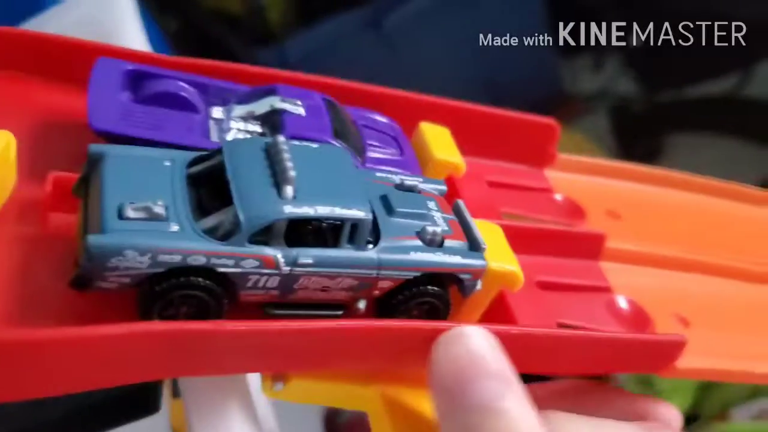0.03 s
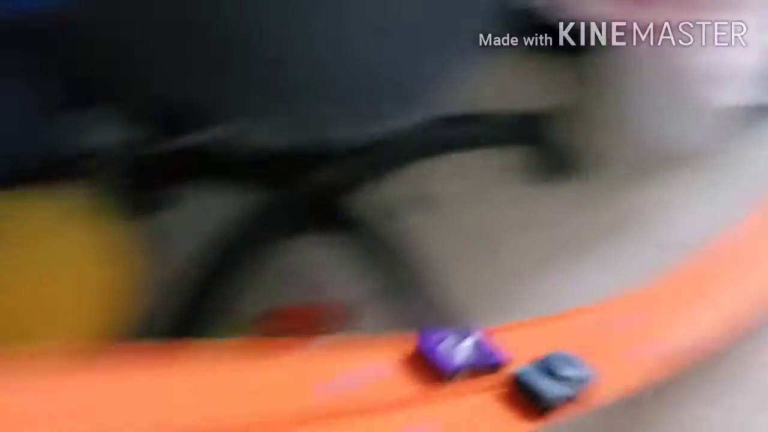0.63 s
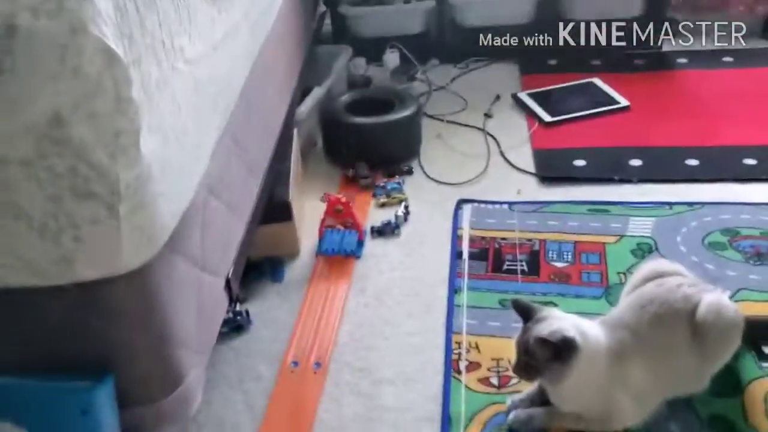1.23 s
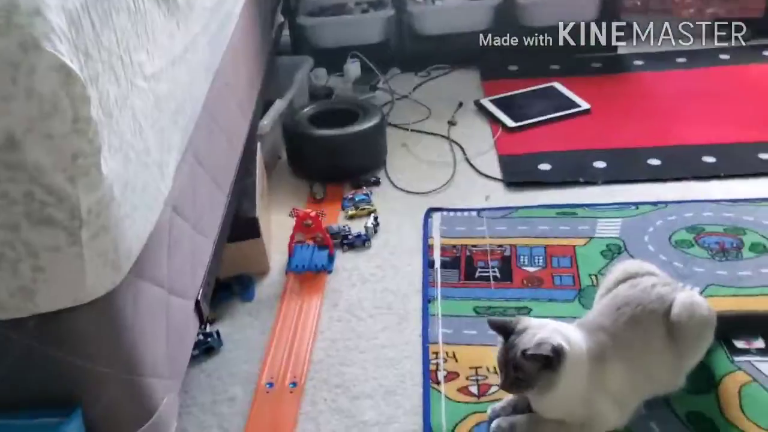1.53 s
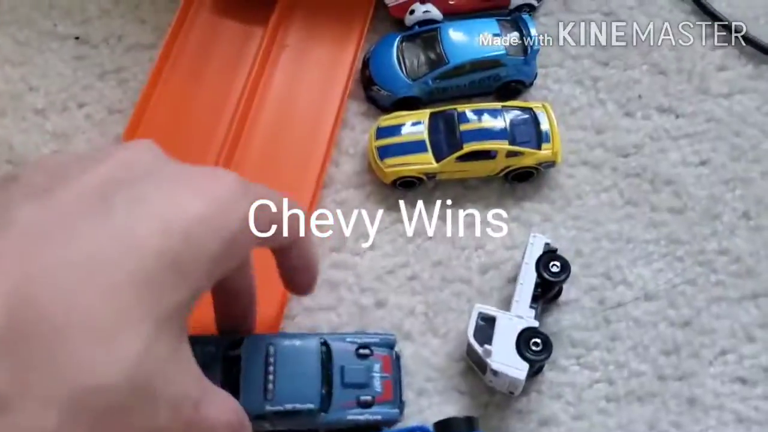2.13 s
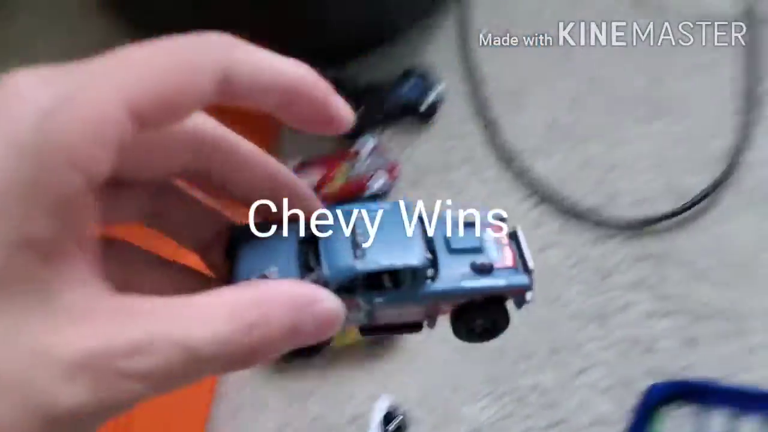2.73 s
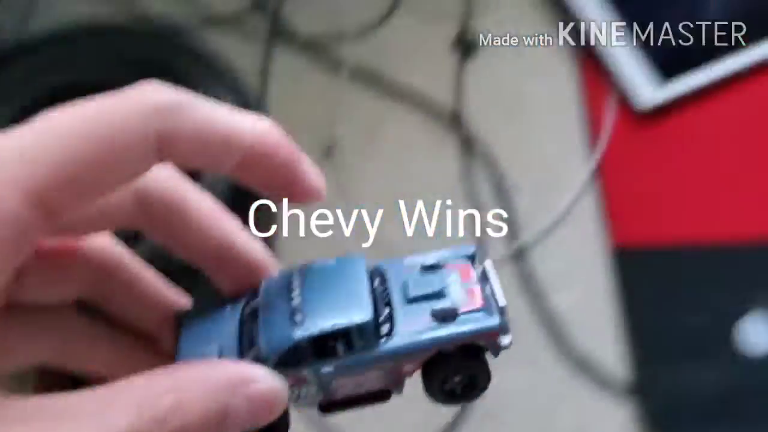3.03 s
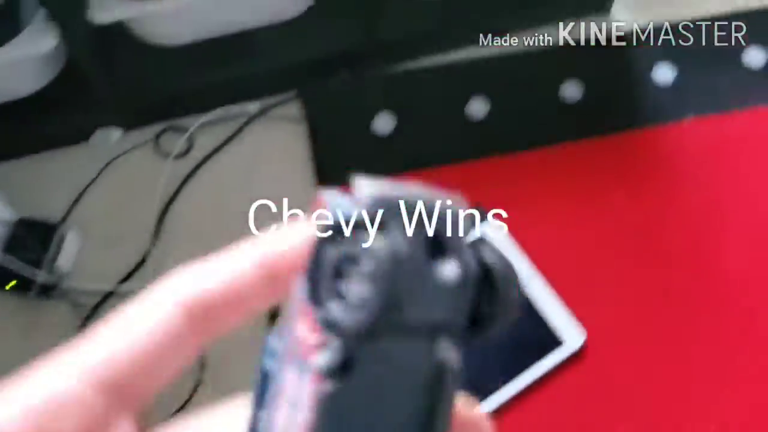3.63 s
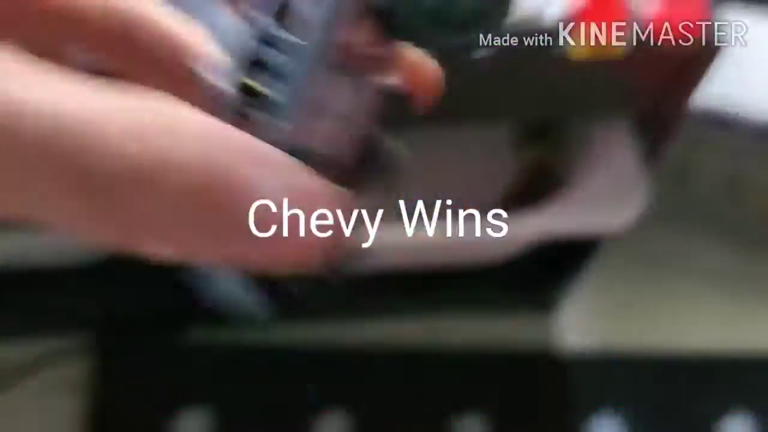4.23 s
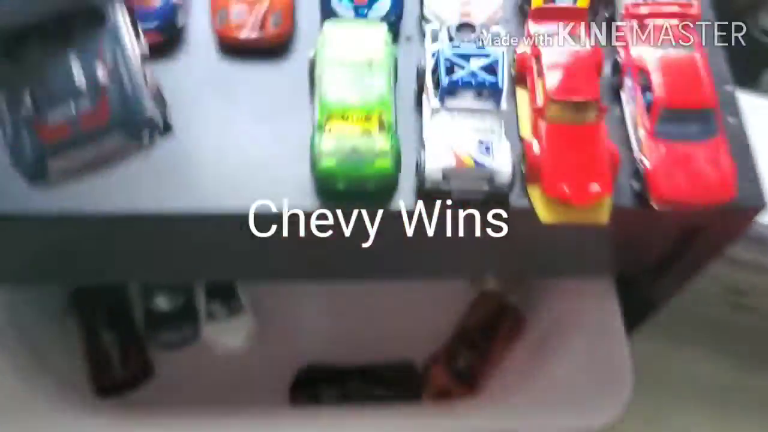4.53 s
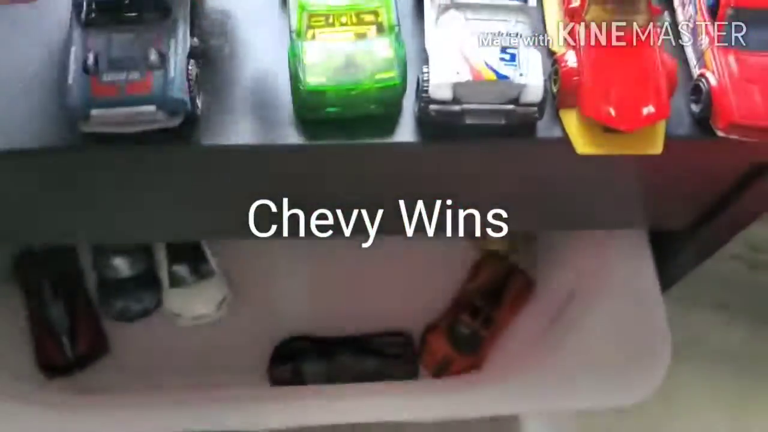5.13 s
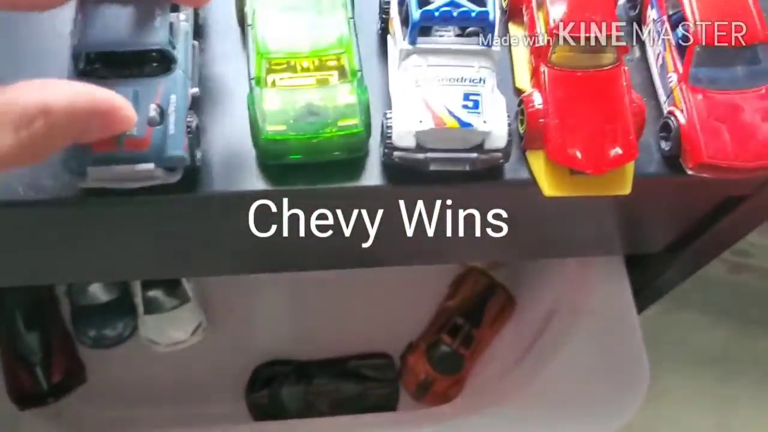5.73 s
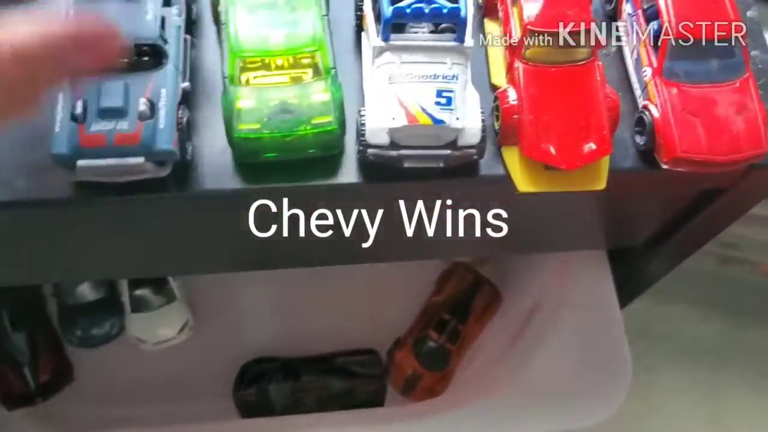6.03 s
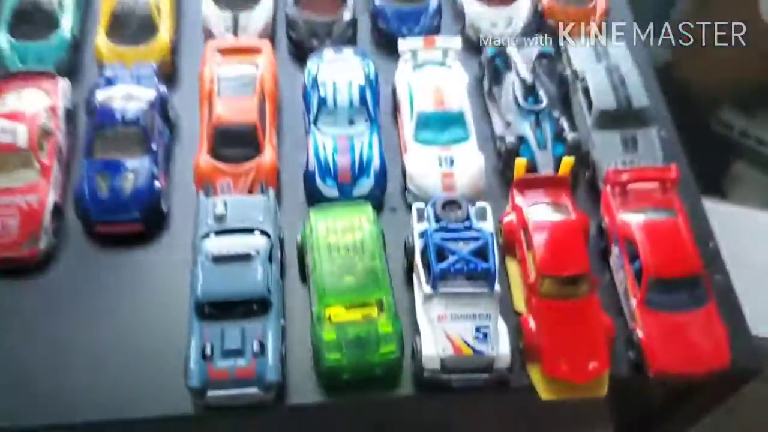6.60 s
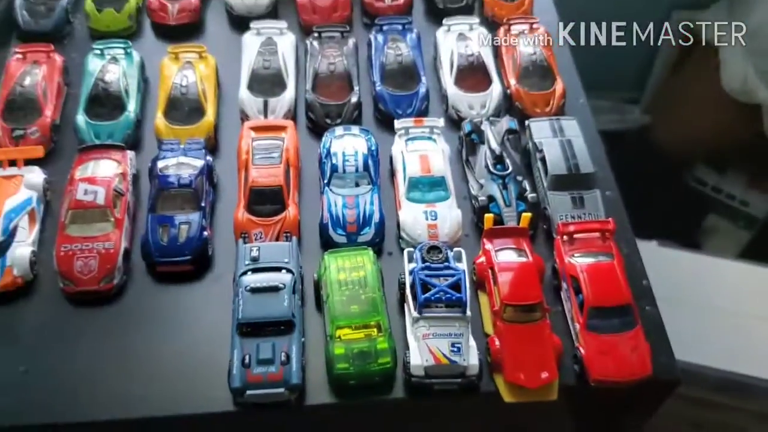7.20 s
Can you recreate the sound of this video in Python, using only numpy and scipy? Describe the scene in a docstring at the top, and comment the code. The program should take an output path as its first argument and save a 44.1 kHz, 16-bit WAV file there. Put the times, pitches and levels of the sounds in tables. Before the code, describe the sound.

At about 0.4 seconds, two die-cast toy cars drop onto a plastic track and rattle along it, slightly right at first, rumbling and clacking over joints as their whirr rises. From 1.2 to 1.5 seconds they skid and crash loudly into a hollow plastic gate. The sound drops out at 1.7 seconds, and a quieter stretch fades in with a small room's low ventilation hum. From 2.2 to 4.5 seconds one car is handled close by, its body and loose wheels clicking, with faint sleeve rustle and dull palm creaks from 3 seconds. Fingers bump the left microphone around 2.7 and 4.1 seconds. The car knocks onto a wooden shelf at 5.1 and 5.3 seconds, rolls softly from 5.6 and stops with a knock near 6. More left-sided finger taps come between 6.6 and 7.1 seconds, with a sharp, loud thump at 6.8.

```python
"""In a small room with humming ventilation, two die-cast toy cars drop from a start gate, rattle down a
plastic track and crash into the hollow finish gate. The sound drops out briefly and a second scene
fades in: a hand picks up one car, its loose wheels clicking, while a sleeve rustles. The car knocks
down on a wooden shelf and is rolled into line. Fingers bump a phone beside its left microphone,
and the palm creaks against its case."""
import sys
import numpy as np
from scipy import signal
from scipy.fft import rfft, irfft, next_fast_len
from scipy.io import wavfile
from scipy.ndimage import map_coordinates

SR = 44100
rng = np.random.default_rng(int(sys.argv[2]) if len(sys.argv) > 2 else 0)


def dump(signal):
    """Clip the signal to [-1, 1] and save it as 16-bit WAV at the path in sys.argv[1]."""
    limited = np.clip(np.atleast_2d(signal).T, -1, 1)
    pcm = np.round(limited * 32767).astype(np.int16)
    wavfile.write(sys.argv[1], SR, pcm)


N = 324576
TIME = np.arange(N) / SR
HIT_TIME = TIME[:SR // 3]  # the clock for one short hit

# The tone colour of each sound. Each row: frequency in Hz, relative level in dB.
VENT_COLOUR = [(20, -31), (35, -16), (56, 2.5), (80, 1.5), (110, -2), (135, -15.5), (168, -15), (200, -26),
               (235, -15), (262, -27), (295, -19), (345, -31.5), (470, -37), (1000, -58.5), (2500, -110)]
AIR_COLOUR = [(400, -23), (800, 2), (1400, 8.5), (2500, 1.5), (5000, -3.5), (6400, 6.5), (7500, -6),
              (15000, -5.5)]
WHEEL_COLOUR = [(1200, -39), (2200, -30), (2700, -3), (3300, -1.5), (3800, -0.5), (4400, 1), (5000, -3.5),
                (5500, -5), (6700, -5.5), (8000, -29), (11000, -44)]
TRACK_COLOUR = [(300, -37), (500, -17), (720, -21), (950, -4), (1150, -6), (1420, -2.5), (1650, -6),
                (2000, -2.5), (2500, -4.5), (3200, -12), (5000, -48)]
WHEEL_HISS_COLOUR = [(5000, -36.5), (7500, 2.5), (9000, -2.5), (10500, -2), (12000, 0.5), (15000, -7.5)]
RUMBLE_COLOUR = [(30, -30.5), (55, -9), (80, -0.5), (120, -2.5), (200, 0), (320, -4), (410, -4), (520, -13),
                 (700, -21), (1200, -50)]
GATE_WALL_COLOUR = [(180, -20), (310, 0.5), (430, 1.5), (580, -22.5), (1200, -39.5)]
SKIN_COLOUR = [(25, -30), (70, 8), (200, 6), (500, -1.5), (900, -5), (2000, -13.5), (3800, -15.5),
               (5000, -24), (7000, -21.5), (9000, -39), (15000, -28)]
SLEEVE_COLOUR = [(400, -9.5), (830, -19), (1400, -9.5), (1800, -10), (2300, -6), (3200, -12.5), (4400, -7),
                 (5200, -12), (6100, -8), (8000, -19), (12500, -19.5), (15500, -35)]
PALM_COLOUR = [(25, 1), (48, 8), (80, -4.5), (130, -15), (230, -3), (330, -14), (550, -25.5), (1200, -26.5),
               (3000, -42)]
SHELF_COLOUR = [(180, -5), (300, -7), (429, 1.5), (528, -12), (683, -2.5), (832, -15), (1000, -2),
                (1340, -4.5), (1660, -4), (1910, -9.5), (2260, -5), (2470, -37), (3200, -50), (4160, -55),
                (7040, -120)]
AXLE_COLOUR = [(1800, -7), (2600, -1), (3600, -0.5), (4600, 2.5), (5500, -10.5), (7000, -15.5), (8300, -31),
               (12500, -28), (14300, -23), (15500, -30)]
# The pitches at which each object rings when shaken. Each row: pitch in Hz, width in Hz, level in dB.
TRACK_RESONANCES = [(1954, 70, 1), (2210, 70, 0), (2314, 60, -2), (2690, 94, -6), (3145, 70, -9.5),
                    (3430, 91, -6), (3700, 50, -2), (3900, 150, -7), (4500, 110, -4.5)]
GATE_RESONANCES = [(298, 50, -7), (340, 32, 0), (379, 28, -1), (418, 28, -2), (466, 50, -13)]
CAR_RESONANCES = [(1440, 1000, -5.5), (2800, 740, 4), (3650, 540, 8.5), (4590, 820, 8), (6000, 660, 2)]
SHELF_RESONANCES = [(420, 69, 0), (612, 82, -21), (1025, 62, -1.5), (1680, 110, 1.5), (2300, 170, -8)]
# The notes of a knocked object. Each row: pitch in Hz, level in dB, seconds to fade by 60 dB.
PHONE_MODES = [(72, 12.5, 0.085), (174, -8.5, 0.099), (247, -6, 0.048)]
SHELF_MODES = [(335.4, -12, 0.023), (421, 11, 0.038), (537, -7.5, 0.078), (1017, -1.5, 0.042),
               (1720, 7, 0.017), (2260, 1.5, 0.023), (2945, -22.5, .014), (5030, -20, 0.0065)]
# How hard the racing wheels chatter. Each row: time in seconds, level in dB.
CHATTER_LEVELS = [(.32, -84.5), (.365, -71), (.44, -38.5), (.596, -34), (.61, -30), (.73, -32), (.85, -26),
                  (.98, -28), (1.1, -34), (1.25, -33.5), (1.37, -39.5), (1.43, -46.5), (1.56, -49),
                  (1.68, -45.5)]
# Their whirr climbs with speed. Each row: time in seconds, pitch in Hz.
WHIRR_PITCHES = [(.4, 1439), (.7, 1705), (1, 2171), (1.12, 2157), (1.25, 1932), (1.68, 1603)]
# The cars hit track joints and the gate. Each row: start in seconds, level in dB.
CRASHES = [(0.405, -50), (.4264, -44), (.439, -31.5), (.446, -35), (.599, -31), (.7209, -35), (.8445, -32),
           (1, -32.5), (1.243, -23.5), (1.266, -23.5), (1.292, -24), (1.356, -28.5), (1.363, -31),
           (1.436, -32.5), (1.5871, -43)]
# The track slaps under the cars. Each row: start in seconds, level in dB, pitch in Hz.
TRACK_SLAPS = [(.441, -31.5, 230), (0.448, -36, 168.2), (.462, -34, 170), (.72, -38, 218.6),
               (.999, -39, 151), (1.245, -41.5, 190), (1.296, -45.5, 198.9), (1.358, -26.5, 272)]
# The finish gate is rammed. Each row: start in seconds, level in dB.
GATE_BOOMS = [(1.357, -18.5), (1.372, -24.5), (1.47, -30)]
# The car is handled. Each row: start in seconds, level in dB, ping pitch in Hz, left minus right in dB.
CAR_CLICKS = [(2.188, -41.5, 3940, 6), (2.358, -47.5, 3950, 3), (2.572, -28.5, 3540, 3),
              (2.7, -38.5, 3670, 3.5), (3.253, -51, 4440, 6), (3.671, -51.5, 4450, 4),
              (3.774, -44.5, 4650, 4.5), (3.911, -48.5, 4580, 2), (4.031, -44.5, 3640, 2),
              (4.149, -40.5, 3940, 2), (4.202, -34, 4780, -5.5), (4.247, -44, 6960, 5),
              (4.484, -45.5, 3900, 10), (5.071, -36, 1950, 6), (5.111, -27.5, 2290, 1.5),
              (5.253, -32, 3020, 1.5), (5.95, -42, 2380, 1)]
# Loose wheels tick as the car is turned. Each row: start and end in seconds, level in dB.
CAR_TURNS = [(2.301, 2.505, -56.5), (3.701, 3.965, -55.5), (4.278, 4.383, -52)]
# Fingers tap the phone. Each row: start in seconds, tick level in dB, the frequency in Hz above which
# the tick weakens, thud level in dB.
FINGER_TAPS = [(2.658, -19.5, 1740, -33.5), (2.6608, -21, 302, -64), (4.092, -32, 300, -26),
               (4.127, -42, 200.5, -32), (6.589, -21, 674, -54), (6.654, -23.5, 1270, -45),
               (6.81, -6, 780, -48), (6.8135, -15.5, 1300, -7.5), (7.146, -34, 2200, -33)]
# The arm moves. Each row: middle and half length in seconds, sleeve level in dB, palm level in dB.
ARM_MOVES = [(3.086, 0.09, -59.5, -61.5), (3.304, 0.072, -58.5, -73), (3.504, 0.063, -58, -45.5),
             (3.799, .25, -63.5, -81), (4.122, 0.095, -53, -41.5), (4.316, 0.086, -66, -52.5),
             (4.556, 0.13, -50, -54)]
# The car meets the shelf. Each row: start in seconds, level in dB.
SHELF_LANDINGS = [(5.071, -27), (5.109, -25.5), (5.254, -31), (5.604, -38.5), (5.956, -28.5),
                  (6.032, -48.5)]
# How hard the car is pushed along the shelf. Each row: time in seconds, level in dB.
PUSH_LEVELS = [(5.55, -79), (5.6, -44.5), (5.67, -46.5), (5.84, -39), (5.92, -45.5), (5.97, -58),
               (6.02, -88)]
# How long the room echoes. Each row: frequency in Hz, seconds to fade by 60 dB.
ECHO_TIMES = [(150, 0.1), (600, 0.39), (1500, 0.27), (4000, 0.28), (14000, 0.18)]

RAMP_S, FINISH_S, RACE_END_S = 0.36, 1.235, 1.688  # cars enter the ramp; reach the gate; the scene ends


def amp(db):
    """Turn decibels into a gain to multiply by."""
    return 10 ** (np.asarray(db) / 20)


def unit(x):
    """Scale to an average (rms) level of 1."""
    return x / np.sqrt(np.mean(x ** 2) + 1e-20)


def peaked(x):
    """Scale to a peak of 1."""
    return x / (np.abs(x).max() + 1e-12)


def unit_hit(x):
    """Scale a hit to an average (rms) level of 1 over its first 10 ms."""
    return x / np.sqrt(np.mean(x[..., :SR // 100] ** 2) + 1e-20)


def along(points, hz):
    """Look up a table by frequency, on a scale of octaves."""
    frequencies, values = np.transpose(points)
    return np.interp(np.log(hz + 1), np.log(frequencies + 1), values)


def curve(rows):
    """Join (time, value) rows with straight lines."""
    return np.interp(TIME, *np.transpose(rows))


def during(rows):
    """A gain of 1 from the first row's time to the last, with soft ends."""
    return np.clip(np.minimum(TIME - rows[0][0], rows[-1][0] - TIME) / .03, 0, 1)


def swell(start_s, db, attack_s, hold_s, fall_db_per_s):
    """A gain that rises, holds and dies away."""
    t = TIME - start_s
    return np.clip(t / attack_s, 0, 1) * amp(db - fall_db_per_s * np.maximum(t - attack_s - hold_s, 0))


def wobble(rate):
    """A smooth curve through `rate` random values a second."""
    return map_coordinates(rng.standard_normal(int(N * rate / SR) + 4), [TIME * rate / SR])


def filtered(x, response):
    """Multiply each frequency in x by response(hz)."""
    length = x.shape[-1]
    padded = next_fast_len(length + 8192)
    return irfft(rfft(x, padded) * response(np.fft.rfftfreq(padded, 1 / SR)), padded)[..., :length]


def coloured(x, colour):
    """Give x a tone colour and an average level of 1."""
    return unit(filtered(x, lambda hz: amp(along(colour, hz))))


def resonate(x, resonances):
    """Let x shake an object that rings at certain pitches."""
    return filtered(x, lambda hz: sum(amp(db) * 1j * hz * width / (pitch**2 - hz**2 + 1j * hz * width)
                                      for pitch, width, db in resonances))


def band(x, low_hz, high_hz):
    """Keep what lies between two frequencies."""
    return signal.sosfilt(signal.butter(2, [low_hz, high_hz], 'band', fs=SR, output='sos'), x)


def pair(x, alike):
    """Mix two unrelated signals into left and right: alike=0 is unrelated, 1 is the same."""
    turn = np.arccos(np.clip(alike, -1, 1)) / 2
    return np.cos(turn) * x[0] + np.sin(turn) * np.array([x[1], -x[1]])


def noise(alike, size=N):
    """White noise for left and right."""
    return pair(rng.standard_normal((2, size)), alike)


def pan(db):
    """Left and right gains; positive dB makes the left louder."""
    return amp(np.array([db, -db]).reshape(2, -1) / 2)


def grains(rate, spread_db):
    """Two random streams of tiny uneven impacts, about `rate` a second."""
    impacts = rng.random((2, N)) < rate / SR
    signs = rng.choice([-1, 1], (2, N))
    sizes = amp(spread_db * np.clip(rng.standard_normal((2, N)), -2, 2))
    return unit(impacts * signs * sizes)


def ring(modes, scatter_db):
    """Fading notes whose strengths vary by about scatter_db from blow to blow."""
    return sum(amp(db + scatter_db * rng.normal() - 60 * HIT_TIME / t60)
               * np.sin(2 * np.pi * hz * HIT_TIME) for hz, db, t60 in modes)


def touch(t60, rise_s, alike):
    """A gritty contact that swells, then fades by 60 dB in t60 seconds."""
    return noise(alike, len(HIT_TIME)) * amp(-60 * HIT_TIME / t60) * (1 - np.exp(-HIT_TIME / rise_s))


def burst(low_hz, high_hz, t60, alike):
    """A puff of noise, like many crowded notes dying together."""
    return unit_hit(band(touch(t60, rise_s=0.00081, alike=alike), low_hz, high_hz))


def add(out, start_s, hit):
    """Mix a hit into out at its start time."""
    part = out[:, round(start_s * SR):][:, :len(HIT_TIME)]
    part += hit[..., :part.shape[1]]


def ventilation(fan_hz=294):
    """Ventilation drones over faint hiss; a wavering fan tone joins in later."""
    drone_db = np.where(TIME < RACE_END_S, -60, -44)
    hiss_db = np.where(TIME < RACE_END_S, -88, -69.5)
    fan = unit(np.sin(2 * np.pi * fan_hz * TIME + 0.69 * wobble(9))) * amp(1.7 * wobble(7))
    fan *= swell(4.27, db=-61, attack_s=0.43, hold_s=.2, fall_db_per_s=1)
    drone = coloured(noise(alike=0.94), VENT_COLOUR) * amp(drone_db)
    hiss = coloured(noise(alike=.2), AIR_COLOUR) * amp(hiss_db)
    return drone + fan + hiss


def passing_db(time_s, closest_s=.65, width_s=.22):
    """Left minus right level of the cars: on the right when close, centred when far."""
    return -7.5 / (1 + ((time_s - closest_s) / width_s) ** 2)


def race():
    """Hard wheels chatter on the track, whirring higher with speed; the ramp rumbles, the cars skid."""
    roll_db, whirr_hz = curve(CHATTER_LEVELS), curve(WHIRR_PITCHES)
    octaves = np.log2(whirr_hz / whirr_hz.max())  # 0 at top speed, negative when slower
    chatter = grains(rate=1500, spread_db=4.5) * amp(1.8 * wobble(140))
    # the cars cross the track's still points (nodes), so each resonance swells and fades by itself
    rings = sum(resonate(chatter, [row]) * amp(3.4 * wobble(16)) for row in TRACK_RESONANCES)
    ringing = chatter + amp(3) * rings
    phase = 2 * np.pi * np.cumsum(whirr_hz) / SR
    whirr = unit(band(noise(alike=0.72), 15, 110) * np.sin(phase))  # uneven wheels blur the pitch
    overtone = unit(band(noise(alike=0.4), 15, 160) * np.sin(2 * phase))
    rattle = (coloured(pair(ringing, alike=0.4), WHEEL_COLOUR) + amp(-8.5) * overtone) * amp(roll_db)
    track = unit(coloured(pair(ringing, alike=.6), TRACK_COLOUR) + amp(-2.5) * whirr)
    track *= amp(roll_db - 4 + 12 * octaves)
    skid = swell(FINISH_S, db=-36, attack_s=.03, hold_s=0.029, fall_db_per_s=69.5)
    hiss = coloured(pair(chatter, alike=.15), WHEEL_HISS_COLOUR)
    hiss *= amp(roll_db - 13.5 + 6 * octaves) + skid
    ramp = swell(RAMP_S, db=-48.5, attack_s=0.054, hold_s=.56, fall_db_per_s=54)
    gate = swell(FINISH_S, db=-48, attack_s=.03, hold_s=0.35, fall_db_per_s=36)
    rumble = coloured(pair(grains(rate=860, spread_db=3), alike=0.91), RUMBLE_COLOUR) * (ramp + gate)
    mix = rattle * pan(passing_db(TIME)) + hiss * pan(-1.2) + track * pan(0.87) + rumble * pan(1.5)
    return during(CHATTER_LEVELS) * mix


def crashes():
    """Metal clacks on plastic; the soft track knocks and thuds, the hard gate cracks and booms."""
    out = np.zeros((2, N))
    for start_s, db in CRASHES:
        crack_db, knock_db = (-24, -7.5) if start_s < FINISH_S else (-10, -20)  # track, else gate
        clack = burst(2400, 7000, t60=.02, alike=.3)
        crack = amp(crack_db) * burst(8200, 21000, t60=0.0063, alike=.15)
        knock = amp(knock_db) * burst(760, 1400, t60=0.028, alike=0.95)
        hit = (clack + crack) * pan(passing_db(start_s) + 4.5) + knock * pan(2.3)
        add(out, start_s, amp(db) * hit)
    for start_s, db, pitch_hz in TRACK_SLAPS:
        thud = burst(pitch_hz / 2, 1.5 * pitch_hz, t60=0.025, alike=1)
        add(out, start_s, amp(db) * thud * pan(5.9))
    for start_s, db in GATE_BOOMS:
        shudder = touch(t60=0.056, rise_s=0.00047, alike=1)  # the loose gate chatters as it is hit
        boom = coloured(resonate(shudder, GATE_RESONANCES), GATE_WALL_COLOUR)
        add(out, start_s, amp(db) * peaked(boom))
    return out


def car_clicks(ticks_per_turn=3, tick_hz=4700, on_shelf_s=5):
    """Loose axles and the car's body click, one part pinging; harder contacts crack brighter."""
    out = np.zeros((2, N))
    hardest_db = max(row[1] for row in CAR_CLICKS)
    ticks = [(start + (end - start) * (k + rng.random()) / ticks_per_turn, db, tick_hz, 0)
             for start, end, db in CAR_TURNS for k in range(ticks_per_turn)]
    for start_s, db, ping_hz, side_db in CAR_CLICKS + ticks:
        contact = touch(t60=0.022, rise_s=0.00063, alike=0.17)
        body = unit_hit(band(resonate(contact, CAR_RESONANCES), ping_hz / 2.8, ping_hz * 2.2))
        ping = unit_hit(resonate(contact, [(ping_hz, 300, 0)]))
        ping_tail = amp(-12) * unit_hit(ring([(ping_hz, 0, 0.04)], scatter_db=0))
        clack = amp(db) * unit_hit(body + ping + ping_tail)
        crack_db = -31 + 2.22 * (db - hardest_db) - 19 * (start_s > on_shelf_s)  # wood dulls the crack
        crack = amp(crack_db) * burst(5860, 12000, t60=0.0063, alike=0.12)
        knock = amp(db - 20) * burst(590, 2300, t60=0.074, alike=0.31)
        add(out, start_s, (clack + crack + knock) * pan(side_db))
    return out


def fingers():
    """Taps and one rub travel through the phone's case, almost only to the left microphone."""
    out = np.zeros((2, N))
    for start_s, tick_db, corner_hz, thud_db in FINGER_TAPS:
        pulse_time = 2 * np.pi * corner_hz * HIT_TIME
        tick = peaked(band(pulse_time * np.exp(-pulse_time), 54, 15000))
        grit = amp(-37) * burst(2200, 11000, t60=0.0091, alike=0.47)
        thud = peaked(ring(PHONE_MODES, scatter_db=7))
        add(out, start_s, amp(tick_db) * (tick + grit) + amp(thud_db) * thud)
    rub = coloured(grains(rate=2900, spread_db=-3), SKIN_COLOUR)
    rub *= swell(6.592, db=-33, attack_s=0.0098, hold_s=.024, fall_db_per_s=700)
    return (out + rub) * amp([[0], [-28]])


def arm_gains():
    """Each arm movement swells and fades. Gives one gain for the sleeve and one for the palm."""
    middle_s, half_s, *levels_db = np.transpose(ARM_MOVES)
    swells = np.exp(-((TIME[:, None] - middle_s) / half_s) ** 2)
    return amp(levels_db) @ swells.T


def sleeve(gain):
    """Cloth fibres slide as the arm carries the car."""
    return coloured(pair(grains(rate=2200, spread_db=0), alike=0.12), SLEEVE_COLOUR) * gain


def palm(gain):
    """The palm creaks dully against the phone as the arm swings."""
    return coloured(noise(alike=0.99), PALM_COLOUR) * gain * pan(2.6)


def shelf_knocks(graze_s=0.012):
    """The board answers each landing and stop of the car with a wooden knock."""
    out = np.zeros((2, N))
    for start_s, db in SHELF_LANDINGS:
        graze = burst(810, 4600, t60=0.12, alike=0.41)  # one wheel brushes the board first
        add(out, start_s - graze_s, amp(db - 21.5) * graze)
        tyres = touch(t60=0.052, rise_s=0.00052, alike=0.97)  # four wheels land almost together
        notes = ring(SHELF_MODES, scatter_db=1.5)
        board = signal.fftconvolve(tyres, notes[None], axes=1)[:, :len(HIT_TIME)]
        clatter = amp(-16) * burst(490, 2160, t60=0.1, alike=0.45)
        add(out, start_s, amp(db) * (peaked(board) * pan(4.3) + clatter))
    return out


def shelf_roll():
    """Pushed slowly, the wheels murmur through the board; the axles scrape when pressed hardest."""
    push_db = curve(PUSH_LEVELS)
    bumps = pair(grains(rate=1000, spread_db=1.5), alike=0.73)
    board = coloured(bumps + amp(5) * resonate(bumps, SHELF_RESONANCES), SHELF_COLOUR) * amp(push_db)
    scrape = coloured(bumps, AXLE_COLOUR) * amp(-46 + 2.05 * (push_db - push_db.max()))
    return during(PUSH_LEVELS) * (board + scrape) * pan(3.6)


def room_echo(x):
    """The walls echo to each microphone; only the long, low waves reach both alike."""
    hz, t, spectrum = signal.stft(rng.standard_normal((2, SR // 2)), SR, nperseg=256)
    spectrum = pair(spectrum, alike=np.sinc(hz / 1300)[:, None])
    fade = amp(-60 * t / along(ECHO_TIMES, hz)[:, None])
    tail = signal.istft(spectrum * fade, SR, nperseg=256)[1]
    tail = np.pad(tail / np.linalg.norm(tail[0]), ((0, 0), (SR // 200, 0)))  # arrives 5 ms late
    return signal.fftconvolve(x, tail, axes=1)[:, :N]


def scene():
    """Mix everything; far sounds carry more echo than those at hand."""
    rolling, hits = race(), crashes()
    clicks, taps = car_clicks(), fingers()
    sleeve_gain, palm_gain = arm_gains()
    near = shelf_roll() + shelf_knocks() + sleeve(sleeve_gain)
    echo = room_echo(amp(-5.5) * rolling + amp(-2.5) * hits + amp(-12) * clicks
                     + amp(-24.5) * taps + amp(-8.5) * near)
    left, right = clicks + near
    late_right = np.interp(TIME - 6 / SR, TIME, right)  # the hand is on the left, so the right lags
    handling = np.array([left, late_right])
    return rolling + hits + handling + echo + taps + palm(palm_gain) + ventilation()


def record(dry, resume_s=1.782, fade_in_s=0.22, fall_db_per_s=2403, top_hz=15600):
    """The race fades out fast, the shelf scene fades in, and the highest treble is removed."""
    race_gain = amp(3 - fall_db_per_s * np.maximum(TIME - RACE_END_S, 0))
    shelf_gain = amp(-7) * np.clip((TIME - resume_s) / fade_in_s, 0, 1)
    return filtered(dry * (race_gain + shelf_gain), lambda hz: 1 / (1 + (hz / top_hz) ** 120))


dry = scene()
out = record(dry)
dump(out)
```